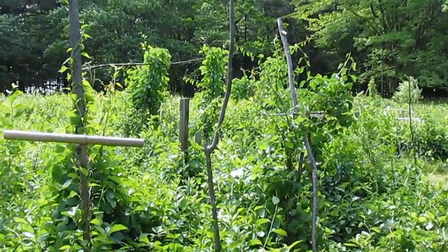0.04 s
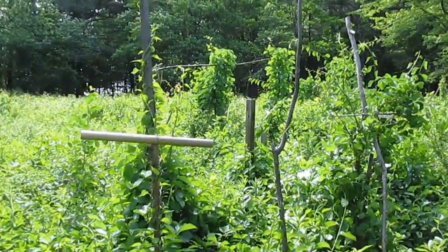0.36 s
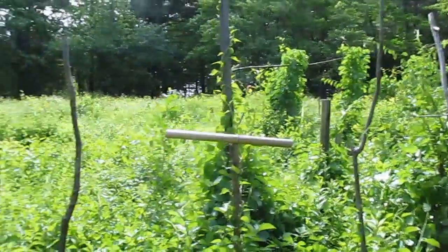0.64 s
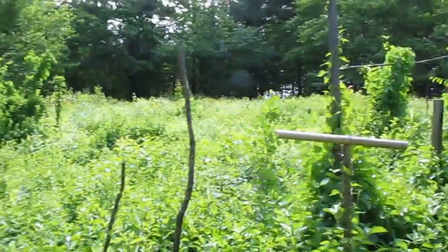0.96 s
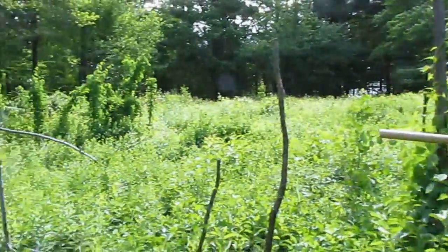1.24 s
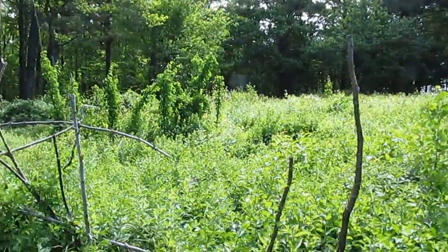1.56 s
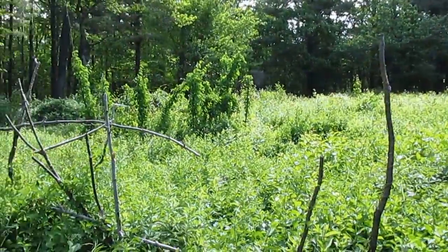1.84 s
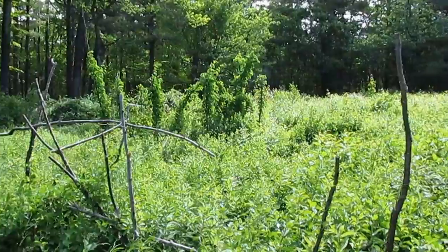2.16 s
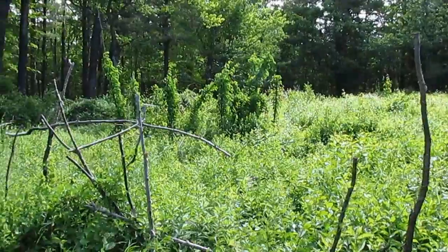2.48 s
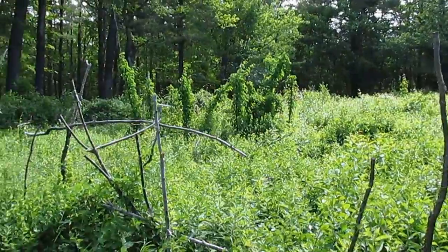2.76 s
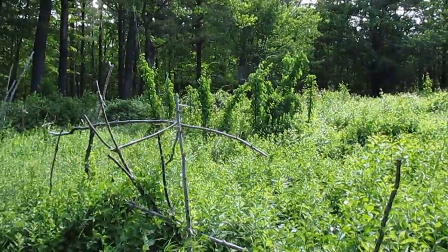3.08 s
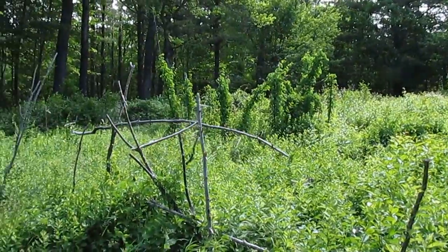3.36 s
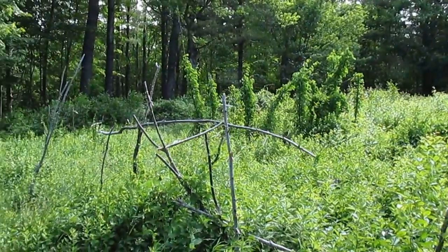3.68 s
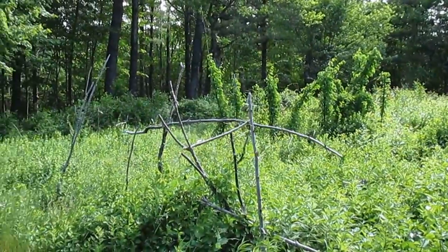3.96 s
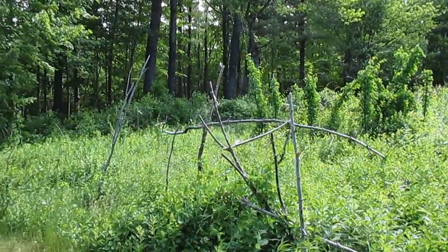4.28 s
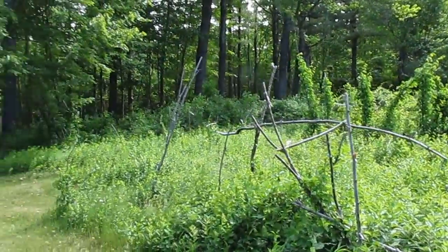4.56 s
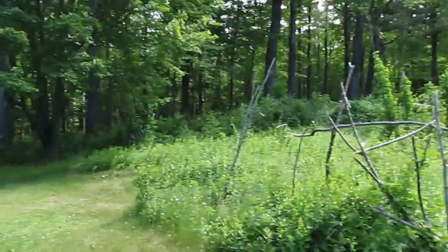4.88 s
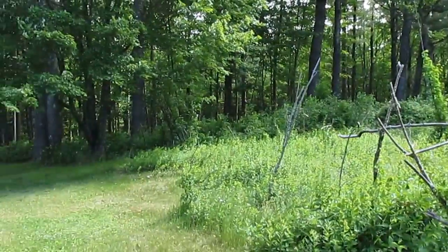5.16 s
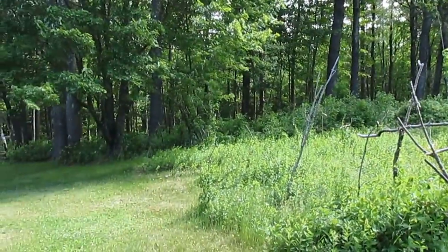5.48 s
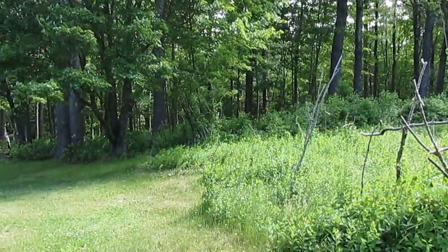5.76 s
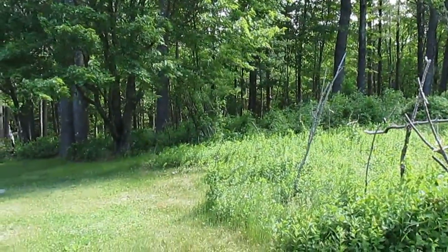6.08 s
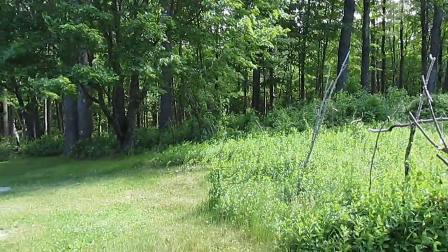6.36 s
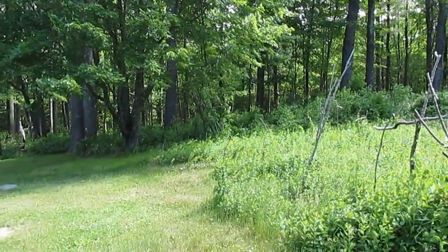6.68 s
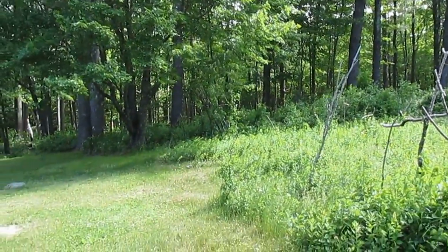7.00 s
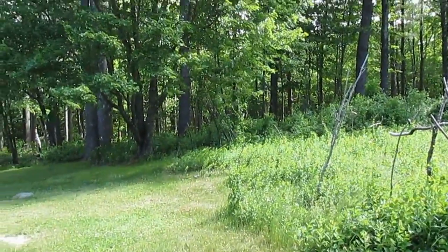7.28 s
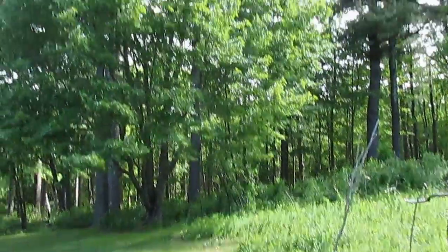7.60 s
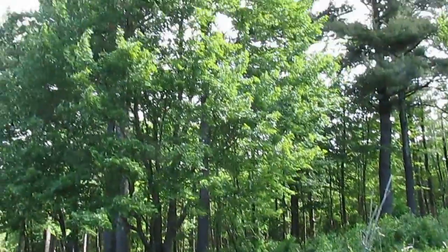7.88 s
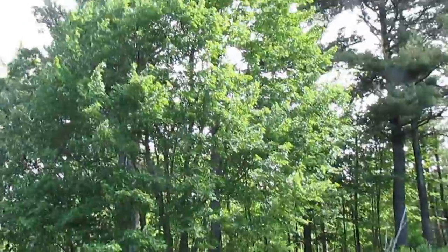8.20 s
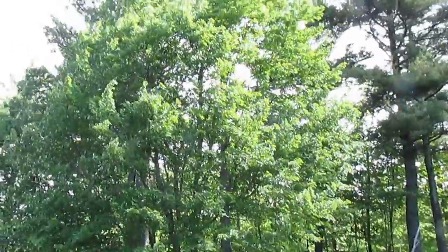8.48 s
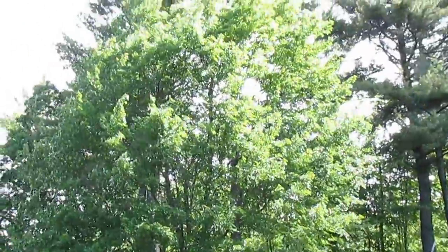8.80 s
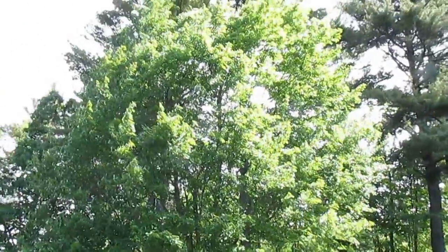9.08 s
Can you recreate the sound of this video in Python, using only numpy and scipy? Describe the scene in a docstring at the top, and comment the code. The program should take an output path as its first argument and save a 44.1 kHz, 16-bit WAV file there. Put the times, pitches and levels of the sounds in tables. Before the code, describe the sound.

Four quick, high, faint bird notes open over the gentle hiss of leaves and the low rush of far trees beside a field. Soon wind starts to rumble on the left side of the microphone in uneven gusts. In the last third it strikes the right side much harder, fluttering and slapping, and the whole sound dips at the strongest blows while the rough buffeting carries on.

```python
"""Four thin notes from a small bird sound over the soft roar of far woods and the hiss of near leaves,
which lies mostly on the left: wind in an overgrown field. Gusts then buffet a camera's two microphone
ports, first the left with a dull rumble, then the right, harder and brighter, as eddies sweep past.
The camera's limiter ducks everything at the hardest blows and recovers slowly."""
import sys
import numpy as np
from scipy import signal
from scipy.fft import rfft, irfft, next_fast_len
from scipy.io import wavfile
from scipy.ndimage import uniform_filter1d, minimum_filter1d, map_coordinates

SR = 44100
rng = np.random.default_rng(int(sys.argv[2]) if len(sys.argv) > 2 else 0)


def wrap_up_sound(samples):
    """Save the sound to the file named by the first command line argument, as 16-bit audio."""
    columns = np.atleast_2d(samples).T
    # keep every value between -1 and 1, then stretch to whole-number steps
    tamed = np.clip(columns, -1, 1)
    steps = np.round(tamed * 32767).astype(np.int16)
    wavfile.write(sys.argv[1], SR, steps)


N = 407484

# gusts that catch a port; head-on ones are faster and rasp:
# (start [s], length [s], port [0 left, 1 right], level [dB], air speed factor [ratio])
PORT_GUSTS = [(1.553, 0.069, 0, -20.5, 0.96), (1.881, .22, 0, -18.5, 0.91), (2.326, 0.48, 0, -14.5, 0.91),
              (2.965, 0.31, 0, -12.5, 1.005), (3.279, 0.33, 0, -16, 0.99), (4.546, .13, 0, -20, .9),
              (4.746, 0.098, 1, -16.5, 1.01), (4.776, 0.15, 0, -13, 1.1), (5.032, 0.16, 0, -13, 0.85),
              (5.239, 0.059, 1, -12.5, 0.87), (5.3, 0.33, 0, -19, 0.98), (5.488, 0.046, 1, -16, 0.83),
              (5.686, 0.09, 1, -11, 0.81), (5.999, .13, 1, -14, .8), (6.062, 0.13, 0, -14.5, 0.92),
              (6.148, 0.081, 1, 0.58, .8), (6.26, 0.25, 1, -1.54, 0.74), (6.759, .09, 1, -5.5, 0.95),
              (6.915, 0.056, 1, -2, 1.23), (7.0, .13, 1, -6.5, 0.7), (7.183, .19, 1, -4, 1.016),
              (7.47, .24, 1, -5.5, 1), (7.969, 0.051, 1, -3.5, .85), (8.065, .085, 1, -3, 1.4),
              (8.161, .09, 1, 3, 1.05), (8.335, .05, 1, 4, .94), (8.45, 0.048, 1, -1, 0.83),
              (8.634, 0.056, 1, -0.5, 1.094), (8.82, 0.044, 1, -3, 0.93), (9.143, .035, 1, -3, 0.69)]
# light air over the ports between gusts: (time [s], left level [dB], right level [dB])
PORT_DRAUGHT = [(0, -43, -32), (.15, -41, -30), (1.2, -43, -41), (1.7, -27.5, -31), (2.6, -22, -32),
                (3.9, -37, -35), (4.4, -29.5, -33), (5.1, -21, -26), (5.9, -29, -21), (6.6, -20.5, -11.5),
                (7.85, -15.5, -12.5), (8.4, -15, -9.5), (9.24, -15.5, -16.5)]
# turbulence spectrum at each port at unit speed: (frequency [Hz], relative level [dB])
LEFT_TURBULENCE = [(15, -20), (35, -5), (78, 0.5), (130, -7), (200, -14.5), (300, -25.5), (500, -49),
                   (900, -70), (2000, -100)]
RIGHT_TURBULENCE = [(15, -28), (45, -8), (120, 2), (250, -3), (500, -14.5), (900, -35.5), (1400, -43.5),
                    (2200, -71), (4000, -100)]
# the hardest eddies, one blow each: (time [s], port [0 left, 1 right], peak at the port [dB], width [s])
HARD_EDDIES = [(2.693, 0, 1.2, .0024), (4.911, 0, -1, 0.002), (5.171, 0, 1, .0022), (6.17, 1, 11, .0011),
               (6.273, 1, 4, 0.00044), (6.487, 1, 1, 0.00041), (6.518, 1, 4, .0011), (6.96, 1, 8, 0.00057),
               (7.222, 1, 9.5, 0.00053), (7.366, 1, 9.5, .0012), (7.515, 1, -2, 0.00048),
               (7.997, 1, 10, 0.00079), (8.16, 1, 7, .00035), (8.197, 1, 14.5, 0.00079),
               (8.339, 1, 13.5, 0.00057), (8.479, 1, 6.5, 0.00036), (8.688, 1, 7, .00037),
               (8.856, 1, 6, 0.0005)]
# wind in the vegetation: (time [s], woods level [dB], leaves level [dB])
VEGETATION_LEVELS = [(0, -35, -37.5), (1.3, -34.5, -39.5), (2.6, -35, -40), (3.2, -36, -41.5),
                     (4.7, -34, -40.5), (5.25, -37.5, -42), (6.1, -38, -41.5), (7.3, -38.5, -39.5),
                     (8.5, -38.5, -40.5), (9.24, -40.5, -42.5)]
# spectra of the roar and the hiss: (frequency [Hz], relative level [dB])
WOODS_SPECTRUM = [(20, -25), (60, 1.5), (150, 1), (300, -1), (500, -2.5), (800, -5), (1200, -6),
                  (1600, -10.5), (2200, -17.5), (3200, -26.5), (5000, -36), (12000, -65)]
LEAF_SPECTRUM = [(500, -11), (1500, 9), (2300, 3.5), (3100, 5), (4200, -0.5), (6000, 3), (7200, 1.5),
                 (8600, -0.5), (10200, -11), (12200, -12.5), (15500, -22)]
# left-right likeness of the woods: (frequency [Hz], coherence [0 to 1])
WOODS_COHERENCE = [(50, 0.95), (140, 1), (300, 0.82), (650, 0.72), (1400, 0.31), (3000, 0.088)]
# leftward lean of the leaves: (frequency [Hz], left minus right level [dB])
LEAF_BALANCE = [(1500, 0), (3000, 2.5), (4400, 1.5), (6500, 7), (8300, 12), (10000, 11), (12000, 4.5),
                (15000, 1)]
# the bird's song: (centre time [s], pitch [Hz], left level [dB], length [s])
BIRD_NOTES = [(.055, 6860, -43, .035), (.16, 7060, -42, .045), (.277, 7000, -46, .035),
              (.385, 7020, -44.5, .03)]

LEFT, RIGHT = 0, 1


def wind_on_ports():
    """Local turbulence drives each port separately; stereo widening adds the other's bass, inverted."""
    flow, speed_factor = airflow(LEFT)
    left = amp(0.5) * buffet(flow, LEFT_TURBULENCE, pace=1.33 * speed_factor, speed_exponent=.22,
                             lump_db=4, lump_hz=36, flutter_db=2, dart_exponent=.45)
    left += eddy_thuds(LEFT)
    flow, speed_factor = airflow(RIGHT)
    right = amp(0.62) * buffet(flow, RIGHT_TURBULENCE, pace=1.02 * speed_factor, speed_exponent=.26,
                               lump_db=2, lump_hz=45, flutter_db=2.5, dart_exponent=.65)
    right += eddy_thuds(RIGHT) + shed_slaps(flow)
    cross_share, corner_hz = 0.36, 476
    crossed_bass = filtered(np.array([right, left]), lambda hz: cross_share / (1 + 1j * hz / corner_hz))
    return np.array([left, right]) - crossed_bass


def airflow(port, attack_s=0.0243, release_s=.028):
    """Draught and gusts add in power, giving a flow strength and a power-weighted air speed factor."""
    t = clock()
    power = amp(curves(PORT_DRAUGHT)[port]) ** 2
    weighted_speed = .8 * power  # the draught only grazes the port
    for start, length, side, db, speed_factor in PORT_GUSTS:
        if round(side) == port:
            rise = np.clip((t - start) / attack_s + .5, 0, 1)
            fall = np.exp(-np.maximum(t - start - length, 0) / release_s)
            gust_power = (amp(db) * rise * fall) ** 2
            power += gust_power
            weighted_speed += speed_factor * gust_power
    return np.sqrt(power), weighted_speed / power


def buffet(flow, spectrum, pace, speed_exponent, lump_db, lump_hz, flutter_db, dart_exponent):
    """Frozen turbulence: a pattern of eddies sweeps past a port, so faster air is louder and brighter."""
    strength = flow * unit(amp(lump_db * np.tanh(wobble(lump_hz))))
    flutter = unit(amp(flutter_db * wobble(130)))  # brief darts swell and sharpen the sound together
    speed = pace * strength ** speed_exponent * flutter ** dart_exponent
    speed = speed / (1 + (speed / 2.1) ** 4) ** (1 / 4)  # air through the narrow port has a top speed
    pattern = filtered(rng.standard_normal(N), lambda hz: amp(along(spectrum, hz)))
    pressure = map_coordinates(pattern, [np.cumsum(speed)], order=1, mode="mirror")
    local_rms = np.sqrt(np.abs(smooth(pressure ** 2, 0.025)) + 1e-12)
    return strength * flutter * pressure / local_rms


def eddy_thuds(port):
    """Each of the hardest eddies strikes a port as a single pressure transient."""
    thuds = np.zeros(N)
    for time, side, db, width_s in HARD_EDDIES:
        if round(side) == port:
            blow = amp(db) * eddy_pulse(width_s)
            start = round(time * SR) - len(blow) // 2
            thuds[start:start + len(blow)] += blow
    return thuds


def shed_slaps(flow, shed_hz=47.24, gap_scatter=0.202, level_db=-2.5, spread_db=4):
    """Vortex shedding: eddies peel off the camera body in an uneven train and slap a port."""
    count = int(N / SR * shed_hz)
    lateness, size = rng.uniform(-1.01, 1, (count, 2)).T
    times = (np.arange(count) + gap_scatter * lateness) / shed_hz
    at = np.clip(times * SR, 0, N - 1).astype(int)
    peaks = flow[at] ** 1.71 * amp(level_db + spread_db * size)  # only strong air sputters through
    return signal.fftconvolve(np.bincount(at, peaks, N), eddy_pulse(width_s=0.00043), mode="same")


def eddy_pulse(width_s):
    """A bipolar pressure pulse pushes the diaphragm, then pulls: wide ones thud, narrow ones slap."""
    t = np.arange(-SR // 50, SR // 50) / SR
    return -t / width_s * np.exp(.5 - .5 * (t / width_s) ** 2)


def woods():
    """Far trees roar; coherence is high at long wavelengths, which reach both ports alike."""
    def mid_side_gains(hz):
        angle = np.arccos(np.clip(along(WOODS_COHERENCE, hz), -1, 1)) / 2
        return amp(along(WOODS_SPECTRUM, hz)) * [np.cos(angle), np.sin(angle)]
    mid, side = filtered(patchy_noise(spread_db=0.32), mid_side_gains)
    level_db = curves(VEGETATION_LEVELS)[0] + 0.53 * wobble(5.33)
    return unit(np.array([mid + side, mid - side])) * amp(level_db)


def leaves():
    """Friction between countless leaves sums incoherently to a gently fluttering hiss."""
    def stereo_gains(hz):
        return amp(along(LEAF_SPECTRUM, hz) + np.outer([.5, -.5], along(LEAF_BALANCE, hz)))
    hiss = unit(filtered(patchy_noise(spread_db=0.45), stereo_gains))
    level_db = curves(VEGETATION_LEVELS)[1] + 0.55 * wobble(14)
    return hiss * amp(level_db)


def bird():
    """Thin tones waver by slight frequency modulation; a level difference places them to the left."""
    t, song = clock(), np.zeros(N)
    waver = 1 + 0.0122 * wobble(150)
    for centre, hz, db, length in BIRD_NOTES:
        envelope = amp(db) * np.exp(-2 * ((t - centre) / length) ** 2)
        song += envelope * np.sin(2 * np.pi * np.cumsum(hz * waver) / SR)
    return song * amp([[1], [-5]])


def patchy_noise(spread_db):
    """Two uncorrelated white noises, their gain varying in small patches of time and frequency."""
    spectra = signal.stft(rng.standard_normal((2, N)), nperseg=512)[2]
    patches = uniform_filter1d(rng.standard_normal(spectra.shape), size=6, axis=1)
    patches = uniform_filter1d(patches, size=14, axis=2)
    return signal.istft(spectra * amp(spread_db * unit(patches)), nperseg=512)[1][:, :N]


def amp(db):
    """Decibels to amplitude ratio."""
    return 10 ** (np.asarray(db) / 20)


def unit(x):
    """Normalisation to rms 1."""
    return x / np.sqrt(np.mean(x ** 2) + 1e-20)


def clock():
    """Sample times in seconds."""
    return np.arange(N) / SR


def along(points, hz):
    """Interpolation on a logarithmic frequency axis."""
    frequencies, values = np.transpose(points)
    return np.interp(np.log(hz + 1), np.log(frequencies + 1), values)


def curves(rows):
    """Linear interpolation in time of each column after the first."""
    times, *columns = np.transpose(rows)
    return [np.interp(clock(), times, column) for column in columns]


def smooth(x, seconds):
    """A triangular running mean."""
    width = max(int(seconds * SR), 1)
    return uniform_filter1d(uniform_filter1d(x, width), width)


def wobble(rate):
    """A spline through random knots, rate of them a second."""
    return map_coordinates(rng.standard_normal(int(N * rate / SR) + 4), [clock() * rate])


def filtered(x, response):
    """Linear filtering: the spectrum times a frequency response."""
    size = next_fast_len(N + SR // 2)
    return irfft(rfft(x, size) * response(np.fft.rfftfreq(size, 1 / SR)), size)[..., :N]


def scene():
    """Superposition of vegetation, bird and wind on the microphone."""
    return woods() + leaves() + bird() + wind_on_ports()


def limiter(x, ceiling_db, attack_s, hold_s, release_s):
    """Look-ahead limiting: both channels duck just before a high peak; the gain holds, then recovers."""
    peak_db = 20 * np.log10(np.abs(x).max(axis=0) + 1e-9)
    needed_db = np.minimum(ceiling_db - peak_db, 0)
    early_db = minimum_filter1d(needed_db, int(attack_s * SR) + 1)
    span = max(int(hold_s * SR), 1)
    held_db = minimum_filter1d(early_db, span, origin=(span - 1) // 2)
    decay = np.exp(-clock() / release_s)
    gain_db = np.minimum.accumulate(held_db / decay) * decay
    return x * amp(smooth(gain_db, attack_s))


def record(dry):
    """The camera's signal chain: bass cut, narrow treble notch, limiter, clipping and band limit."""
    bass_cut_hz, notch_hz, notch_half_width_hz, top_hz = 15, 7875, 85, 15750
    bass_cut = lambda hz: hz / np.hypot(hz, bass_cut_hz)
    notch = lambda hz: np.abs(hz - notch_hz) / np.hypot(hz - notch_hz, notch_half_width_hz)
    coloured = filtered(dry, lambda hz: bass_cut(hz) * notch(hz))
    limited = limiter(coloured, ceiling_db=0.22, attack_s=0.0056, hold_s=0.14, release_s=0.74)
    return filtered(np.clip(limited, -1, 1), lambda hz: hz < top_hz)


dry = scene()
out = record(dry)
wrap_up_sound(out)
```